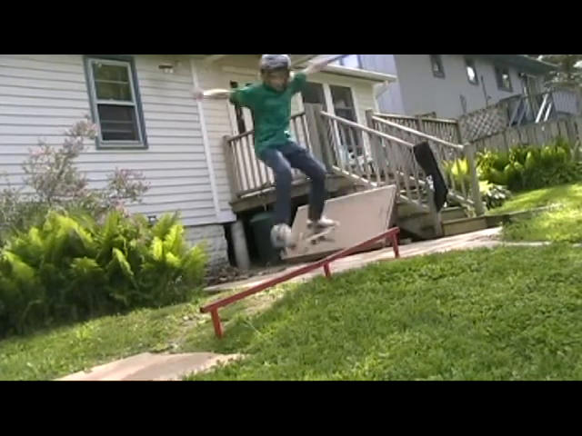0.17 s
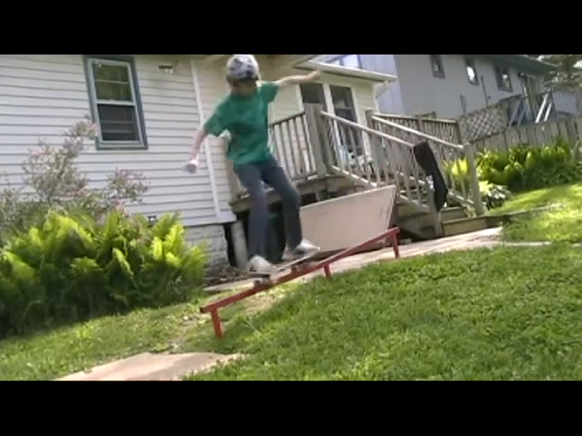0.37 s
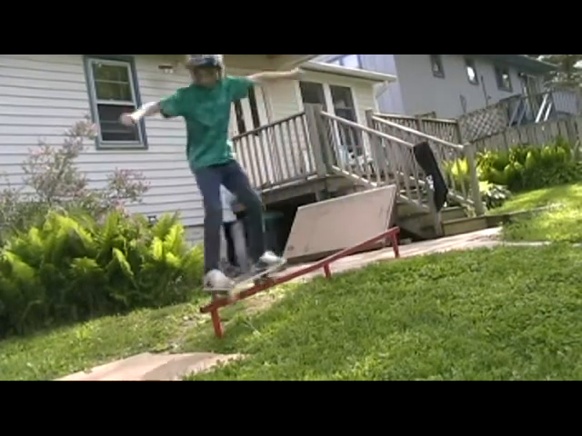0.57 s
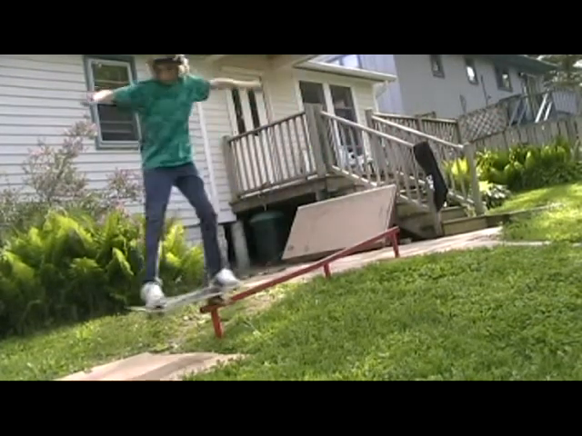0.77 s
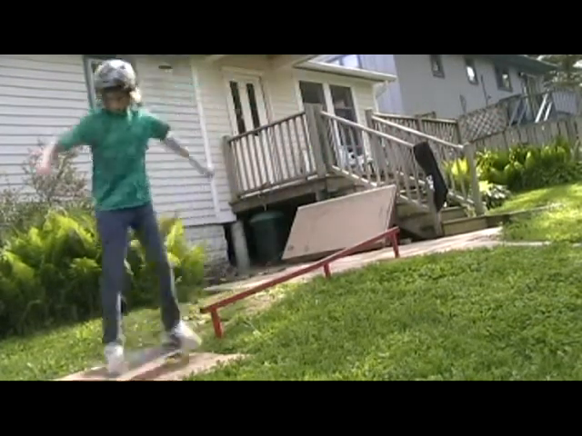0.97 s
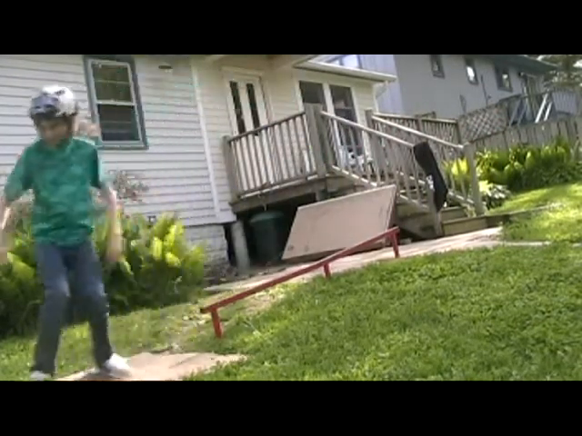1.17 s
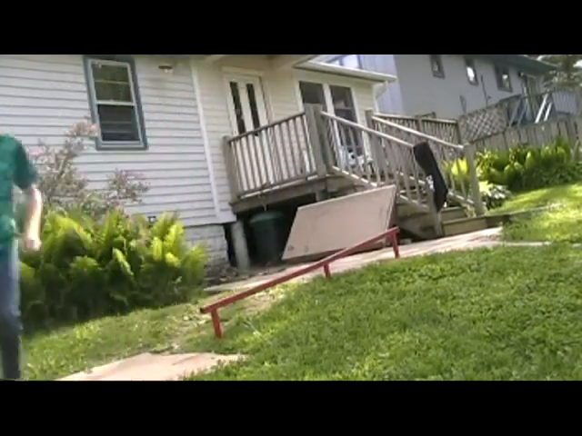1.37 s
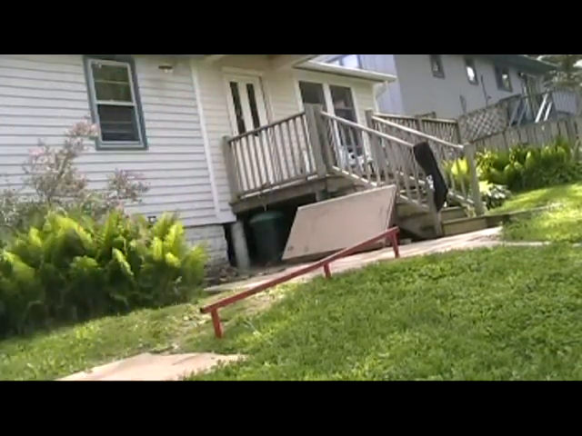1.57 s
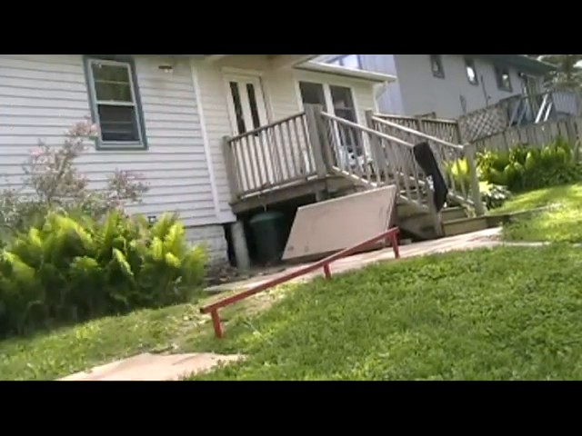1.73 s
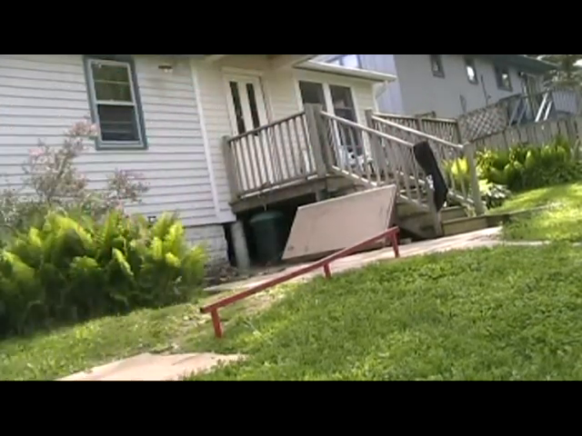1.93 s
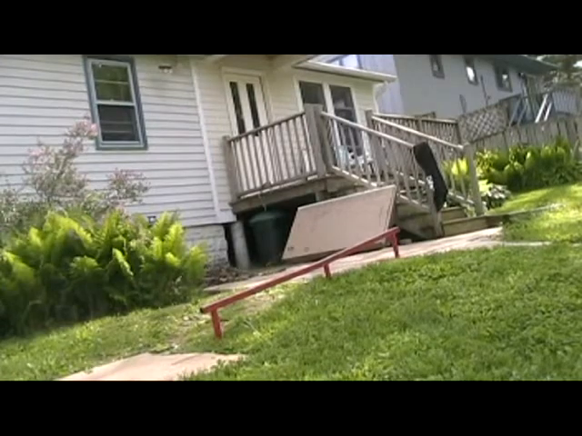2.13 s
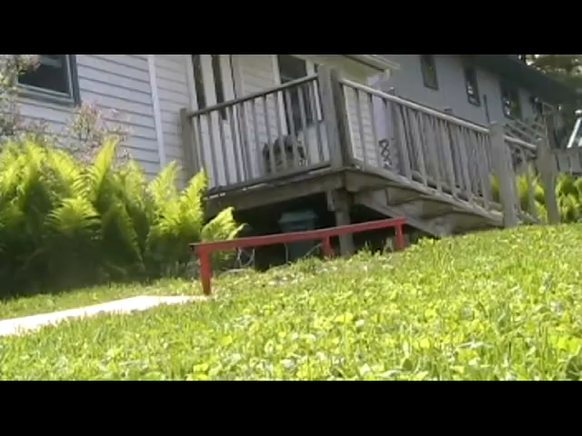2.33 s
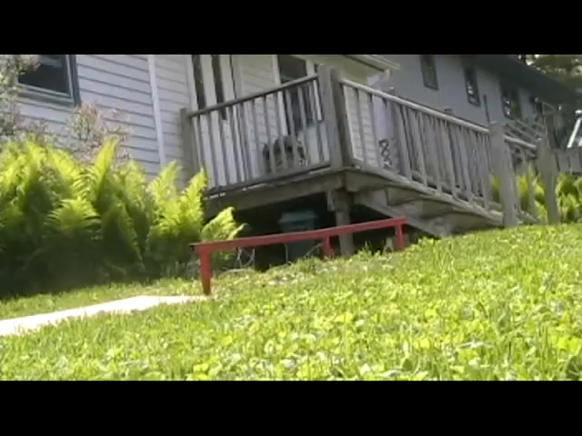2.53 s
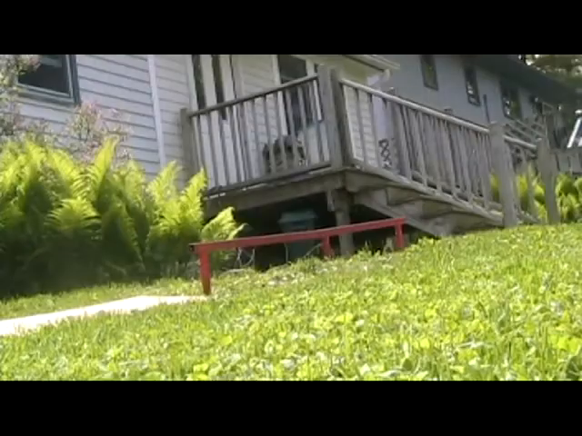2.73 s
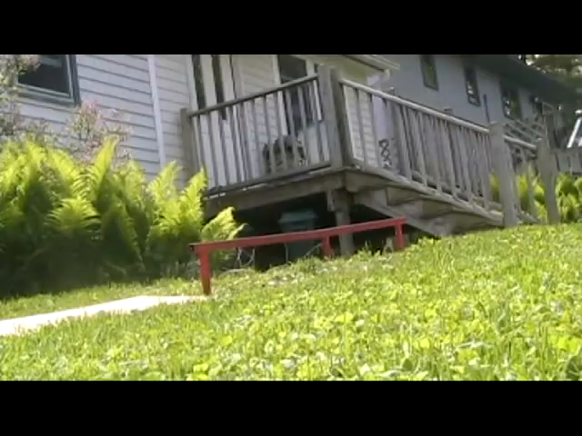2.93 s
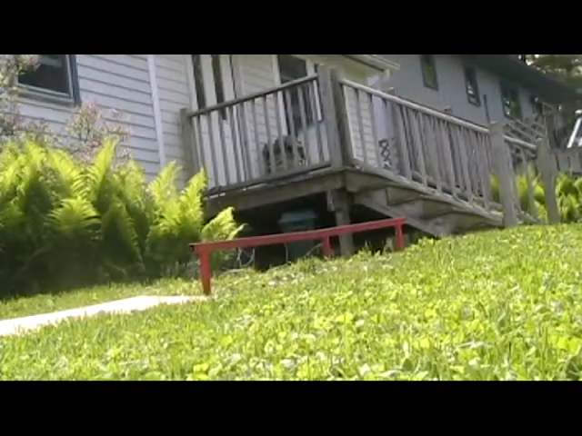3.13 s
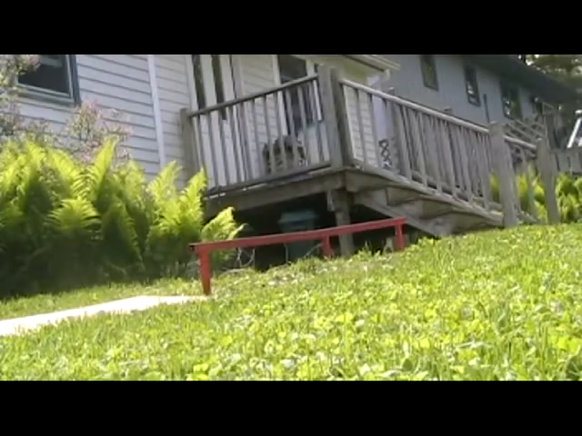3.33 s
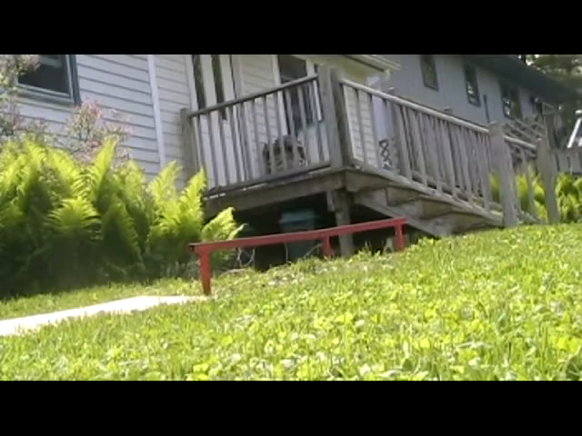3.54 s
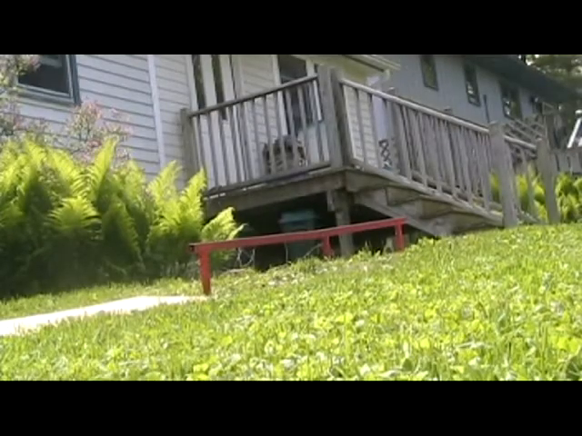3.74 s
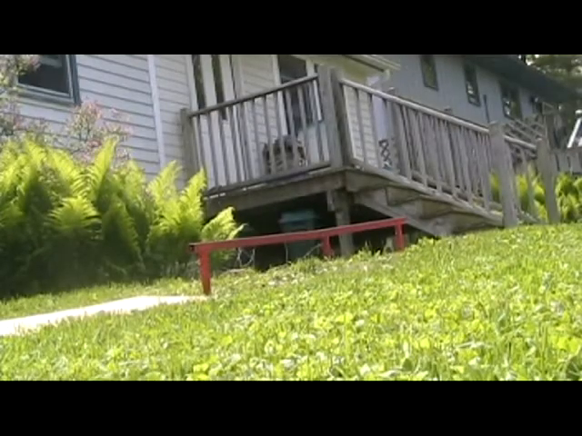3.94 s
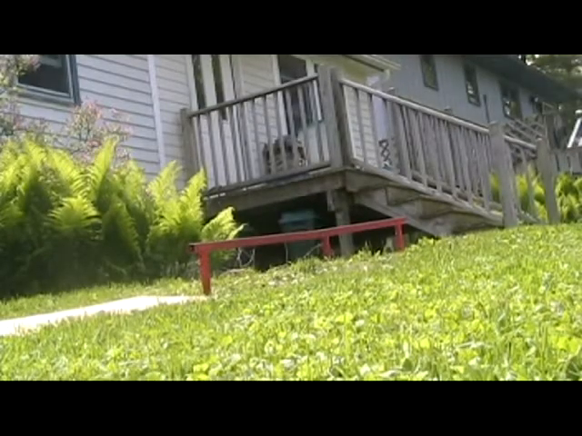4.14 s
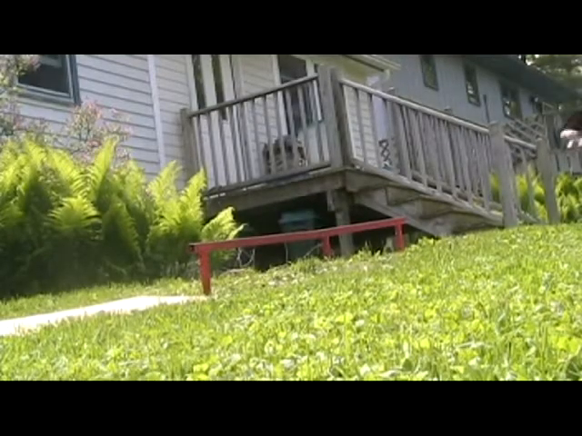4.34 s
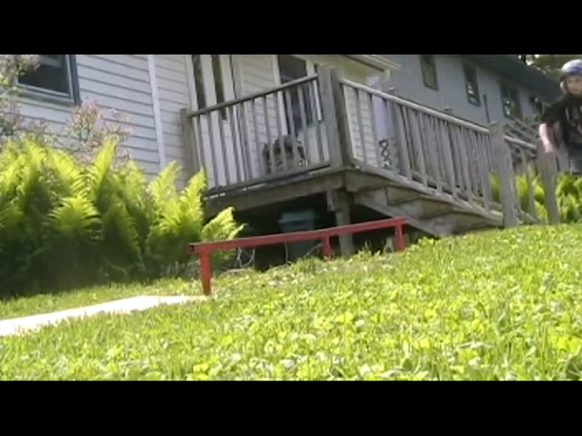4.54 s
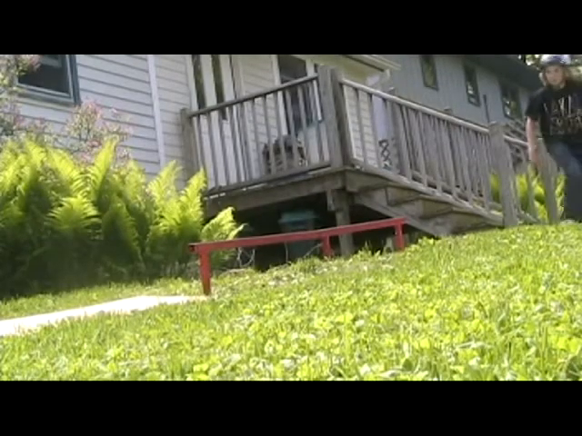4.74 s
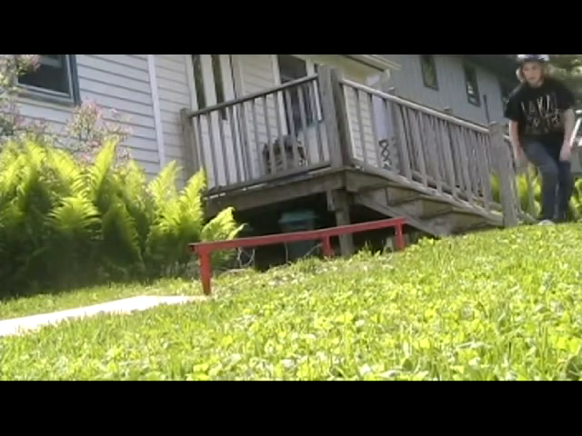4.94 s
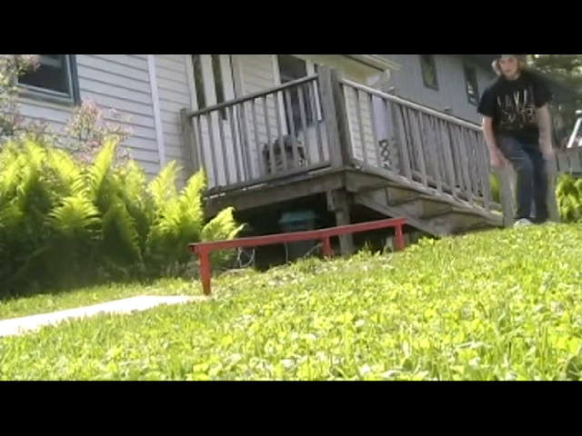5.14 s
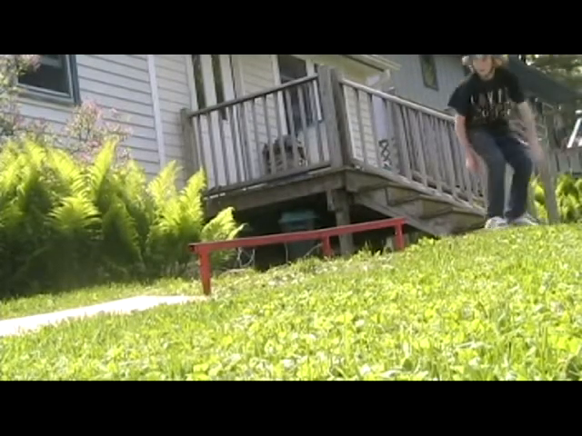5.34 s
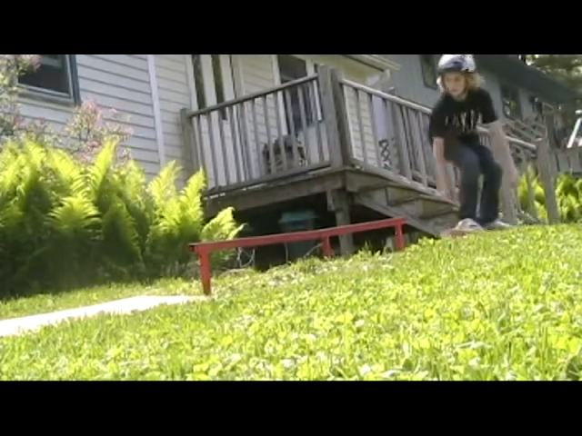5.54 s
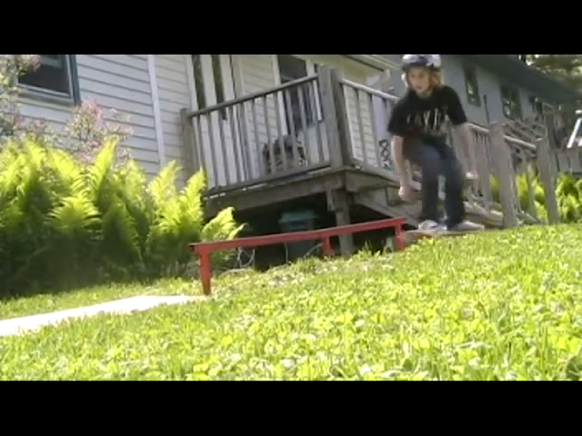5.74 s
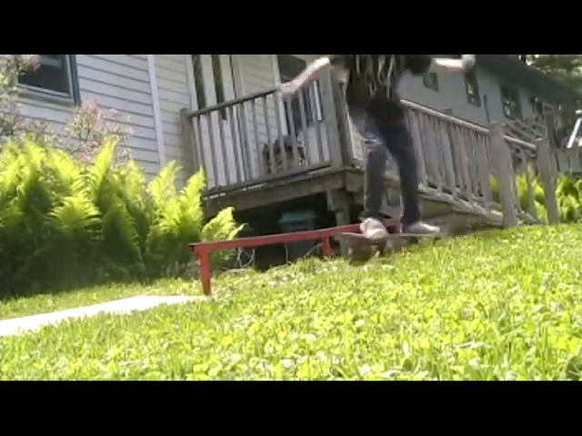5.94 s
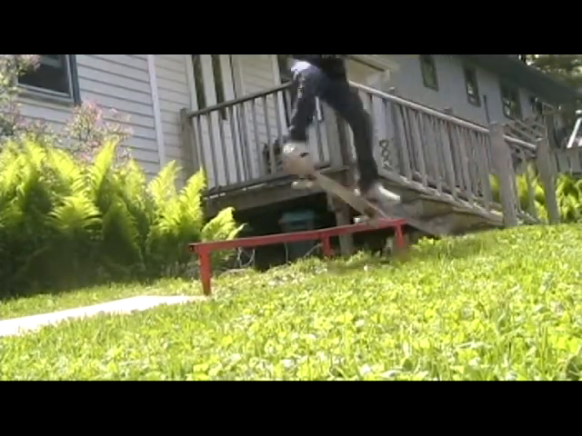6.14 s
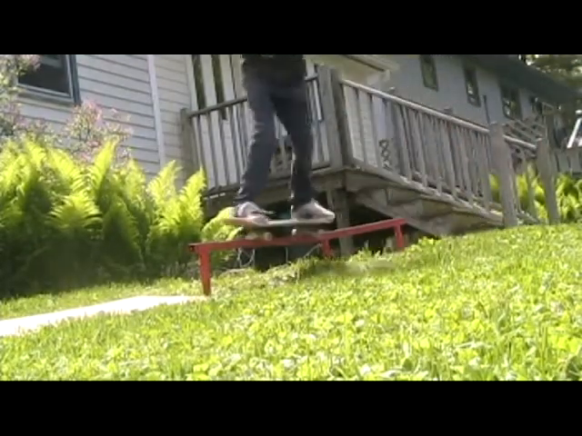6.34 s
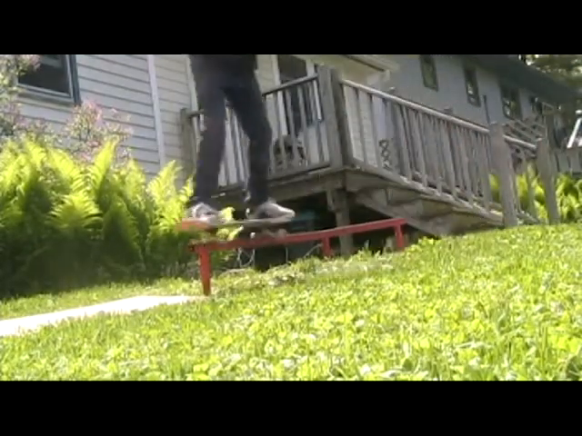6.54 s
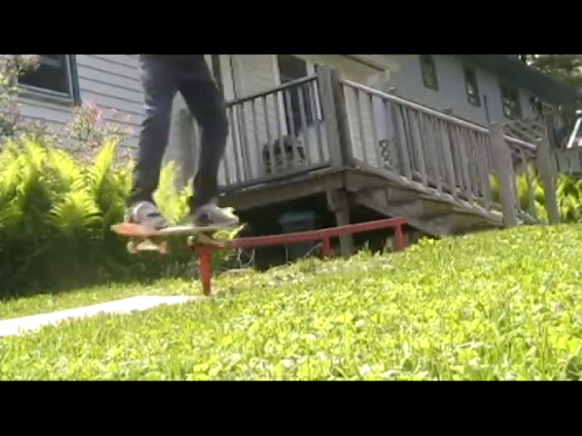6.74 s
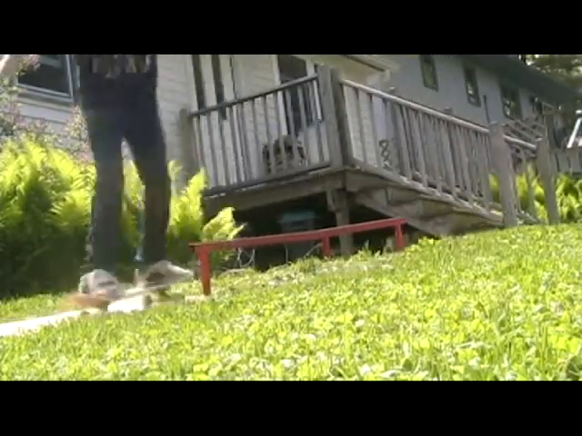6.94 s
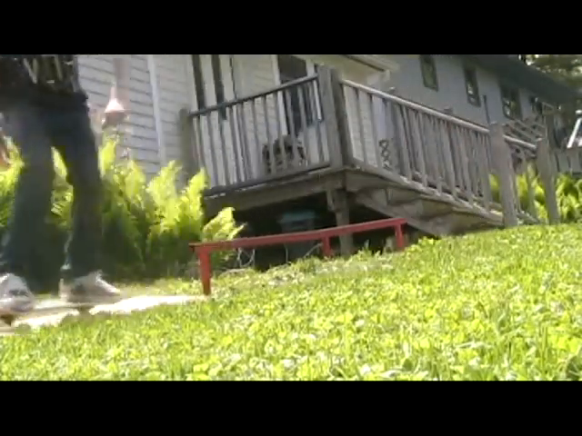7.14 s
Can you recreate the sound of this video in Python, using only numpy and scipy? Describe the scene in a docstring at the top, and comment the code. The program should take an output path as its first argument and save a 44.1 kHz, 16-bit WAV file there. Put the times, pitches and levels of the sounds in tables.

```python
"""A yard in two takes: a skateboard runs up over concrete, pops, slides along a low steel rail, lands and rolls
away; after a silence, heard from low grass, it crosses boards to a whistle, bird chips and squeaks, slides, lands.
Noise of grit and blows rings the resonances of ground, deck, wheels, rail and trucks; sparse echoes return.
Shaped noise makes the wind and air, short cosines the low thuds, gliding sines the birds, wavering tones a
faint hum; the two-port microphone colours everything and clips the loudest peaks."""
import sys
import numpy as np
from scipy import signal
from scipy.fft import rfft, irfft
from scipy.io import wavfile
from scipy.ndimage import uniform_filter1d

SR = 44100
rng = np.random.default_rng(int(sys.argv[2]) if len(sys.argv) > 2 else 0)


def digitize_waveform(pressure):
    """Quantize a signal to 16-bit integers and store it at the path in sys.argv[1].

    Rows of a 2-D input are taken as channels; values are limited to [-1, 1].
    """
    field = np.atleast_2d(pressure).T
    bounded = np.clip(field, -1, 1)
    quanta = np.round(bounded * 32767).astype(np.int16)
    wavfile.write(sys.argv[1], SR, quanta)


N = 321930


def gain_of(db):
    """Turns decibels into an amplitude factor."""
    return 10 ** (np.asarray(db) / 20)


def evened(x):
    """Scales a signal to an RMS of 1 over all its rows together."""
    return x / np.sqrt(np.mean(x ** 2) + 1e-20)


def smoothed_twice(x, first, second):
    """Two moving averages, lengths in samples, leave only the slow drift of a noise."""
    return uniform_filter1d(uniform_filter1d(x, first), second)


def read(points, hz):
    """Reads a curve over frequency, straight between points on a log scale."""
    f, value = np.transpose(points)
    return np.interp(np.log(hz + 1), np.log(f + 1), value)


def follow(tables):
    """Joins the rows of all tables in time into one curve a column."""
    s, *columns = np.vstack(tables).T
    return np.array([np.interp(np.arange(N) / SR, s, c) for c in columns])


def add(mix, s, sound):
    """Lays a sound into the mix from s seconds on, cut off at its end."""
    part = mix[..., round(s * SR):][..., :sound.shape[-1]]
    part += sound[..., :part.shape[-1]]


def coloured(x, points):
    """Filters a signal by a curve of dB over Hz."""
    return irfft(rfft(x) * gain_of(read(points, np.fft.rfftfreq(N, 1 / SR))), N)


def swept_sine(hz):
    """A sine whose frequency follows a curve sample by sample."""
    return np.sin(2 * np.pi * np.cumsum(hz) / SR)


def ring(modes):
    """The answer of a body to one short push, with energy 1; neighbouring modes swing in opposition."""
    t = np.arange(2500) / SR
    h = 0
    for k, (hz, width, db) in enumerate(modes):
        swell_and_decay = width ** 1.5 * t * np.exp(-1.5 * np.pi * width * t)
        h = h + (-1) ** k * gain_of(db) * swell_and_decay * np.sin(2 * np.pi * hz * t)
    return h / np.linalg.norm(h)


# The two takes in the yard. Each row: start in seconds, end in seconds.
TAKES = [(0, 2.444), (3.2, 7.3)]
LOW_VIEW_WHEELS_DB, LOW_VIEW_TRUCKS_DB = -11.5, -5  # heard from the grass, wheels and trucks are weaker


def low_view(s):
    """True in the second take, where the camera and its microphone lie in the grass."""
    return np.asarray(s) >= TAKES[1][0]


def grit(spread_db, lumpy_db, stones_per_s):
    """Wheels and steel run over grains of unlike size; bumps and small stones shake all parts at once."""
    bumps = evened(smoothed_twice(rng.standard_normal((6, N)), 500, 300))
    bumps = evened(bumps + bumps[0])  # partly common to all parts
    stones = rng.random(N) * (rng.random(N) < stones_per_s / SR)
    jolts = signal.lfilter([1], [1, -np.exp(-1 / (.005 * SR))], stones)  # each dies away with 5 ms
    grains_db = spread_db * np.minimum(rng.exponential(1, (6, N)), 5)
    size = gain_of(grains_db + lumpy_db * bumps)
    return evened(size * (1 + jolts / 2) * rng.standard_normal((6, N)))


# What lies under the skateboard: open concrete, boards, the steel rail, the landing, and the nearby boards with
# a louder ground. Each row: ground beside rumble in dB, wheels and trucks beside scrape in dB (all three at the
# middle level), dB that the wheels move for each dB of scrape.
CONCRETE = (-7, 11, -3.5, 0.71)
BOARDS = (-1, 16, -0.5, 1)
STEEL = (-10, 1.5, 1.5, 1)
LANDING = (-4.5, 11.5, -4, 0.95)
NEAR_BOARDS = (1, 9, -2, -0.2)
# Passes through the yard. Each row: time in seconds, rumble of the deck in dB, scrape of the hard parts in dB
# and, in the two slides, the grind of deck on rail in dB.
RUN_UP = [(0, -22.5, -47.5), (.09, -31, -34.5), (0.151, -32.5, -43.5), (0.241, -26.5, -31),
          (.3, -32.5, -43), (0.411, -30.5, -44)]
SLIDE = [(.5, -46.5, -29.5, 2), (.6, -43, -34, -0.5), (0.68, -40, -33.5, 8), (.78, -27, -25.5, 9.5),
         (.885, -29, -26.5, 2.5), (.92, -31.5, -38, 5.5), (.97, -25.5, -28.5, 4.5),
         (1.08, -32.5, -39, 10.5)]
ROLL_AWAY = [(1.25, -29, -38.5), (1.5, -32, -37), (1.75, -38.5, -39), (2.11, -35.5, -37),
             (2.13, -38, -45.5), (2.44, -41.5, -45.5)]
SECOND_RUN_UP = [(3.201, -55.5, -70), (4.44, -48, -59), (4.5, -38, -50), (4.64, -29, -47),
                 (4.731, -36.5, -53), (4.85, -32.5, -47.5), (5.0, -28.5, -41.5), (5.16, -28.5, -43.5),
                 (5.35, -31, -51.5), (5.55, -28.5, -39.5), (5.75, -28, -45.5), (6.15, -23.5, -44.5),
                 (6.26, -26, -39)]
SECOND_SLIDE = [(6.47, -36, -42.5, 4.5), (6.526, -22.5, -17.5, -2.5), (6.57, -26, -22, -2),
                (6.65, -30, -32.5, 2.5), (6.951, -26, -34.5, 3), (7.133, -36, -47.5, 16)]
RIDE_OUT = [(7.203, -18, -37), (7.3, -20, -44)]
# The whole ride. Each row: what is underfoot, the pass over it.
PASSES = [(CONCRETE, RUN_UP), (STEEL, SLIDE), (LANDING, ROLL_AWAY),
          (BOARDS, SECOND_RUN_UP), (STEEL, SECOND_SLIDE), (NEAR_BOARDS, RIDE_OUT)]
MIDDLE_DB = -33
GROUND_SWING, TRUCKS_SWING = 0.98, 1.214  # dB that they move for each dB of rumble or scrape
GRIND_DB, GRIND_SHARE = -0.1, 0.71  # grind level beside the wheels; share of its swell the wheels take


def rolling():
    """Rumble drives ground and deck, scrape drives wheels, rail and trucks, shared out by the contact."""
    rows = []
    for (ground_db, wheels_db, trucks_db, wheels_swing), curve in PASSES:
        s, rumble, scrape, *grind = np.transpose(curve)
        ground = ground_db + MIDDLE_DB + GROUND_SWING * (rumble - MIDDLE_DB)
        wheels = wheels_db + MIDDLE_DB + wheels_swing * (scrape - MIDDLE_DB)
        wheels = wheels + LOW_VIEW_WHEELS_DB * low_view(s)
        trucks = trucks_db + MIDDLE_DB + TRUCKS_SWING * (scrape - MIDDLE_DB)
        trucks = trucks + LOW_VIEW_TRUCKS_DB * low_view(s)
        rubbing = wheels + GRIND_DB + grind[0] if grind else s * 0 - 90  # next to nothing off the rail
        wheels = wheels + GRIND_SHARE * sum(grind)
        rows.append(np.transpose([s, ground, rumble, wheels, scrape, trucks, rubbing]))
    return gain_of(follow(rows)) * grit(spread_db=3.0, lumpy_db=1.5, stones_per_s=13.0)


# Tail and wheels on the ground. Each row: time in seconds, push on the deck in dB, push on the rail in dB,
# t60 of the rattle in seconds, note in Hz.
KNOCKS = [(0.183, -22.5, -25, 0.049, 1500), (0.2038, -30, -11, .035, 1420),
          (0.3716, -34.5, -23.5, 0.13, 1506), (0.7225, -20.5, -29.5, 0.08, 900),
          (0.98, -32, -21, 0.044, 1514), (1.015, -37, -22.5, 0.034, 1305),
          (1.1788, -20.5, -12.5, 0.058, 1500), (1.1862, -14.5, -20, 0.086, 520),
          (1.1953, -24, -17.5, 0.038, 1212), (4.457, -29.5, -52.5, 0.074, 600),
          (4.470, -34, -39.5, 0.18, 2240), (4.8818, -18.5, -35.5, 0.31, 559),
          (4.9100, -11.5, -32, 0.12, 653), (4.9264, -19, -25.5, 0.24, 2390), (5.0479, -16, -41, 0.18, 518),
          (5.0856, -12, -35, 0.17, 834), (5.1039, -25, -20.5, 0.057, 2230), (5.6048, -14, -33.5, 0.14, 692),
          (5.6281, -17.5, -29, 0.11, 2180), (5.812, -21, -35.5, 0.15, 620), (6.292, -10.5, -21.5, 0.2, 813),
          (6.4282, -21, -33, 0.18, 598), (7.1578, 3, -22, 0.05, 800), (7.163, 3, -31.5, 0.051, 430)]
# Bright metallic clanks and a few small or faint ticks. Each row: time in seconds, push on deck, rail and
# trucks in dB, t60 of the rattle in seconds.
CLANKS = [(0.4311, -29, -13, -0.5, .058), (0.4715, -26, -19, -17, 0.06), (0.5266, -36, -19, -17, 0.047),
          (3.459, -47.5, -48, -40, 0.046), (6.4924, -8, -32, -26, 0.1), (6.4982, -13, -14.5, -13.5, 0.07),
          (6.5145, -11.5, -27, -32.5, 0.15), (6.675, -22, -26.5, -39, 0.074)]
# First push of a hard knock over the rattle, as a factor, on ground, deck, wheels, rail and trucks.
KNOCK_SIZE = [1.2, 24, 3.1, 21, 18]
WOOD_TOP_HZ = 1100  # notes below are of wood
KNOCK_WHEELS_DB, CRACK_WHEELS_DB, CLANK_WHEELS_DB = 11.5, 4, 6  # beside the rail: low note, high note, clank
KNOCK_TRUCKS_DB, BLOW_GROUND_DB = -8, -13  # trucks beside the rail, ground beside the deck
SOFT_DB, HARD_RANGE_DB, SWELL_S = -22.5, 14.5, 0.0011  # weak blows swell, strong ones knock


def blows():
    """Each blow is a dying rattle; strong ones begin with a hard knock, weak ones are scuffs that swell."""
    force, t = np.zeros((5, N)), np.arange(8000) / SR
    hits = []
    for s, deck, rail, t60, hz in KNOCKS:
        wheels = rail + (KNOCK_WHEELS_DB if hz < WOOD_TOP_HZ else CRACK_WHEELS_DB)
        hits.append((s, deck, wheels, rail, rail + KNOCK_TRUCKS_DB, t60))
    for s, deck, rail, trucks, t60 in CLANKS:
        hits.append((s, deck, rail + CLANK_WHEELS_DB, rail, trucks, t60))
    for s, deck, wheels, rail, trucks, t60 in hits:
        wheels = wheels + LOW_VIEW_WHEELS_DB * low_view(s)
        db = np.array([[deck + BLOW_GROUND_DB], [deck], [wheels], [rail], [trucks]])
        hard = np.clip((db.max() - SOFT_DB) / HARD_RANGE_DB, 0, 1)
        rise = 1 - (1 - hard) * np.exp(-t / SWELL_S)
        push = rise * gain_of(-60 * t / t60) * rng.standard_normal((5, 8000))
        push[:, 0] = hard * np.array(KNOCK_SIZE)
        add(force, s - .001, gain_of(db) * push)
    return force


WOOD_CYCLES, HARD_CYCLES = 10, 21  # the note falls 60 dB in this many cycles
WOOD_NOTE_DB, HARD_NOTE_DB = -2, 16.5  # beside the push on deck or rail


def notes():
    """Each knock also sounds one short note: of the wood if low, of the hard parts if high."""
    out, t = np.zeros(N), np.arange(4000) / SR
    for s, deck_db, rail_db, _, hz in KNOCKS:
        if hz < WOOD_TOP_HZ:
            db, cycles = deck_db + WOOD_NOTE_DB, WOOD_CYCLES
        else:
            db, cycles = rail_db + HARD_NOTE_DB, HARD_CYCLES
        add(out, s - .001, gain_of(db - 60 * t * hz / cycles) * np.sin(2 * np.pi * hz * t))
    return out


def shifting(x, patchy_db):
    """Narrow bands of the rolling sound wax and wane at random."""
    z = signal.stft(x, nperseg=1024, noverlap=768)[2]
    patches = uniform_filter1d(rng.standard_normal(z.shape), size=2, axis=0)  # across frequency
    patches = uniform_filter1d(patches, size=14, axis=1)  # along time
    gain = gain_of(patchy_db * evened(patches))
    return signal.istft(z * evened(gain), nperseg=1024, noverlap=768)[1][:N]


# Resonances of the ground boards, deck, wheels, rail and trucks, of the deck rubbing on the rail, and of the
# rail's long ring under the grind. Each row: frequency in Hz, width in Hz, level within the body in dB.
GROUND = [(156, 79, -3), (251, 74, -0.5), (376, 70, -1)]
DECK = [(493.3, 116, 1.5), (659, 120, 0.5), (830, 220, 0.5), (1094, 300, -6)]
WHEELS = [(1250, 814, 9.9), (1750, 410, 10.96), (2190, 840, 5.7)]
RAIL = [(2075, 410, 11), (2770, 480, 9.5), (3510, 640, 11.5), (4620, 1000, 6.5)]
TRUCKS = [(5430, 950, -0.048), (6330, 540, 0.034), (7230, 620, 1), (8140, 650, 1.7), (8750, 2200, -1.3)]
GRIND = [(1430, 560, 0)]
TUBE = [(3370, 50, 0)]
# While the steel rings freely. Each row: start in seconds, end in seconds.
ON_RAIL = [(.425, 1.08), (6.485, 6.72)]


def board():
    """Rolling and blows shake the boards on the ground, the deck, the wheels, the rail and the trucks."""
    roll, t = rolling(), np.arange(N) / SR
    touching = sum((t > a) * (t < b) for a, b in ON_RAIL)
    tube = gain_of(-12.5) * signal.oaconvolve(roll[3] * touching, ring(TUBE))[:N]  # driven by the rail's share
    rings = np.array([ring(modes) for modes in (GROUND, DECK, WHEELS, RAIL, TRUCKS, GRIND)])
    rolled = signal.oaconvolve(roll, rings, axes=1)[:, :N].sum(0)
    struck = signal.oaconvolve(blows(), rings[:5], axes=1)[:, :N].sum(0)  # blows do not grind
    return shifting(tube + rolled, patchy_db=2.5) + struck + notes()


# Squeaks of the board. Each row: start in seconds, length in seconds, frequency in Hz, level in dB.
SQUEAKS = [(4.582, 0.22, 2147, -41.5), (4.582, 0.2, 3560, -53), (4.699, 0.4, 3120, -53)]
SQUEAK_WIDTH_HZ = 140


def squeaks():
    """Short fuzzy squeaks as the rider's weight settles: tones wavering at random in strength and phase."""
    out, t = np.zeros(N), np.arange(SR // 2) / SR
    for s, length, hz, db in SQUEAKS:
        drift = uniform_filter1d(rng.standard_normal((2, len(t))), round(SR / SQUEAK_WIDTH_HZ))
        fuzz = evened(drift)
        shape = np.clip(np.minimum(t / 0.006, 1 - t / length), 0, 1)
        tone = (1 + fuzz[0]) * np.sin(2 * np.pi * hz * t) + fuzz[1] * np.cos(2 * np.pi * hz * t)
        add(out, s, gain_of(db) * shape * tone)
    return out


# Low thuds, among them those of the skateboard, the last two in the ride-out. Each row: time of the middle in
# seconds, peak in dB, frequency in Hz.
THUDS = [(0.408, -14, 151), (1.111, -15, 170), (1.803, -16, 179.2), (1.945, -13.5, 95), (1.941, -16, 324.5),
         (7.234, -0.5, 270), (7.264, -3, 300)]


def thuds():
    """Each low thud is two cycles of a cosine that swell and fade, alike at both ports."""
    out = np.zeros(N)
    for s, db, hz in THUDS:
        t = np.arange(-1 / hz, 1 / hz, 1 / SR)
        add(out, s + t[0], gain_of(db) * np.cos(2 * np.pi * hz * t) * np.hanning(len(t)))
    return out


def yard(x, t60, gap):
    """Sparse echoes off walls and deck posts, from gap seconds on, other ones for each port."""
    at = np.arange(round(gap * SR), SR // 3, 20) + rng.integers(0, 20, (2, 1))
    at = at + rng.integers(0, 10, at.shape)
    echoes = rng.choice([-1., 1.], at.shape) * gain_of(-60 * at / SR / t60)
    taps = np.zeros((2, SR // 2))
    np.put_along_axis(taps, at, echoes, 1)
    return signal.fftconvolve(x[None], taps / np.linalg.norm(taps[0]), axes=1)[:, :N]


# Wind at the microphone, one list a take. Each row: time in seconds, level before the lumps in dB.
WIND = [
    [(0, -38), (.4, -38), (.55, -48), (.8, -34.5), (2.44, -35.5)],
    [(3.2, -47.5), (7.3, -53)],
]
# Colour of the buffeting. Each row: frequency in Hz, relative level in dB.
GUST = [(15, -18.5), (30, 5.5), (60, 2), (130, 0), (400, -32.5)]


def wind():
    """Lumpy low buffeting as shaped noise, unlike at the two ports in the deepest notes."""
    common, unlike = rng.standard_normal((2, N))
    unlike = signal.lfilter(*signal.butter(1, 260, fs=SR), unlike)
    lumps = evened(smoothed_twice(rng.standard_normal(N), 2500, 2000))
    ports = np.array([common + 0.43 * unlike, common - 0.84 * unlike])
    return gain_of(follow(WIND) + 0.9 * lumps) * evened(coloured(ports, GUST))


# Bird chips in the yard. Each row: start in seconds, level before the port balance in dB.
CHIPS = [(4.179, -25.5), (5.486, -25)]
# Rise of one chip. Each row: time from its start in seconds, frequency in Hz.
CHIP = [(0, 5700), (.006, 7120), (.011, 8100)]
# The falling whistle. Each row: time in seconds, level of the clear note in dB, frequency in Hz.
WHISTLE = [(3.887, -58, 2960), (3.931, -51, 2380), (4.001, -55, 2250), (4.049, -61.5, 2127),
           (4.14, -47.5, 2110), (4.16, -68, 2070)]


def birds():
    """Two quick rising chips and one falling whistle, breathy above its clear note, echoing in the yard."""
    chips, t = np.zeros(N), np.arange(0, CHIP[-1][0], 1 / SR)
    chip = swept_sine(np.interp(t, *np.transpose(CHIP))) * np.hanning(len(t)) ** 0.38
    for s, db in CHIPS:
        add(chips, s, gain_of(db) * chip)
    s, db, hz = np.transpose(WHISTLE)
    t = np.arange(s[0], s[-1], 1 / SR)
    pitch = np.interp(t, s, hz)
    hoarse = 1.14 + 0.085 * evened(uniform_filter1d(rng.standard_normal(len(t)), 150))
    clear, breathy = swept_sine(pitch), swept_sine(pitch * hoarse)
    voice = clear + gain_of(10.0) * np.hanning(len(t)) * breathy
    whistle = np.zeros(N)
    add(whistle, s[0], gain_of(np.interp(t, s, db)) * voice)
    chips_heard = chips * gain_of([[-1], [1]]) + gain_of(-5.5) * yard(chips, 0.39, 0.00069)
    return chips_heard + whistle + gain_of(1.5) * yard(whistle, .45, 0.012)


# Colour of the air and hiss. Each row: frequency in Hz, relative level in dB.
AIR = [(60, -18.5), (125, -9.5), (500, -21.5), (2500, -33.5), (6000, -36.5), (10600, -40), (12000, -57)]
# Thin high rustle. Each row: frequency in Hz, width in Hz, level within the band in dB.
RUSTLE = [(8450, 1200, 0)]
AIR_DB, RUSTLE_DB = -47, -46.5  # the rustle before flicker and blending of the ports


def air():
    common, unlike = rng.standard_normal((2, N))
    flicker = evened(uniform_filter1d(rng.standard_normal(N), 1200))
    band = signal.oaconvolve(rng.standard_normal((2, N)), ring(RUSTLE)[None], "same")
    rustle = gain_of(RUSTLE_DB + 2.1 * flicker) * band
    rustle = (rustle + rustle[0]) / 2 * ~low_view(np.arange(N) / SR)
    ports = np.array([common + 0.57 * unlike, common - unlike])
    return rustle + gain_of(AIR_DB) * evened(coloured(ports, AIR))


# Faint steady tones. Each row: frequency in Hz, width in Hz, level in dB.
HUM = [(133.4, 20, -49.5), (1150, 22, -62), (10660, 200, -72.5)]


def hum():
    """A few tones under everything, each wavering slowly in strength and phase."""
    t, out = np.arange(N) / SR, 0
    for hz, width, db in HUM:
        a, b = uniform_filter1d(rng.standard_normal((2, N)), round(SR / width))
        tone = a * np.cos(2 * np.pi * hz * t) + b * np.sin(2 * np.pi * hz * t)
        out = out + gain_of(db) * evened(tone)
    return out


def scene():
    """The skateboard and its echoes in the yard, with thuds, wind, birds, air and hum around."""
    skate = board() + squeaks()
    echoes = gain_of(-26.0) * yard(skate, 0.34, 0.0087)
    return skate + echoes + thuds() + wind() + birds() + air() + hum()


# Colour of the microphone. Each row: frequency in Hz, gain in dB.
MICROPHONE = [(15, -10.5), (60, 1), (10500, -4), (12000, -11), (16000, -34.5)]
# Phase between its two ports. Each row: frequency in Hz, lead of the left port in radians.
PORTS = [(60, 1.9), (230, 0.28), (1000, 0.08), (4500, 0.42)]


def record(dry):
    """Microphone colour, phase shift between the ports, overload, the cut between takes and the band limit."""
    hz = np.fft.rfftfreq(N, 1 / SR)
    lead = read(PORTS, hz) / 2  # half on each side
    turn = np.exp(1j * np.array([lead, -lead]))
    ports = irfft(rfft(dry) * gain_of(read(MICROPHONE, hz)) * turn, N)
    t = np.arange(N) / SR
    running = sum(np.clip(np.minimum(t - a, b - t) / .002 + 1, 0, 1) for a, b in TAKES)
    loud = np.clip(ports, -.97, .97) * running
    band_limit = signal.firwin(511, 16000, window=("kaiser", 9), fs=SR)
    return signal.oaconvolve(loud, band_limit[None], "same")


dry = scene()
out = record(dry)
digitize_waveform(out)
```